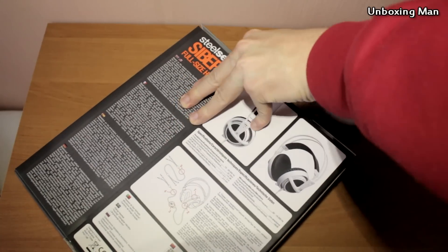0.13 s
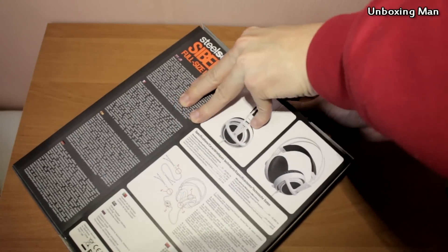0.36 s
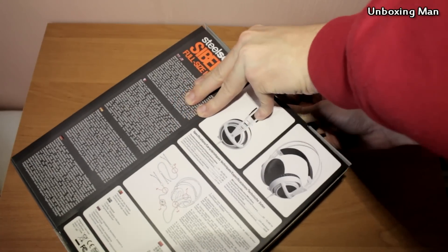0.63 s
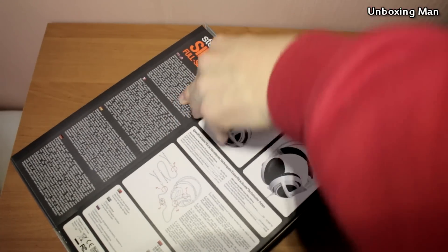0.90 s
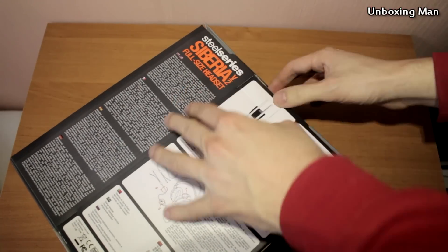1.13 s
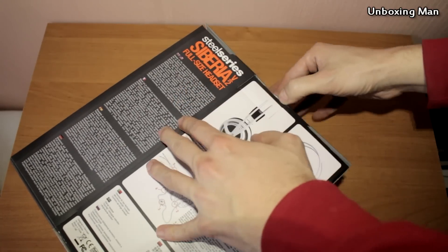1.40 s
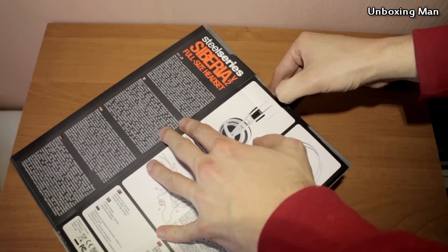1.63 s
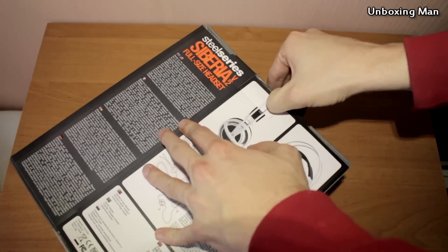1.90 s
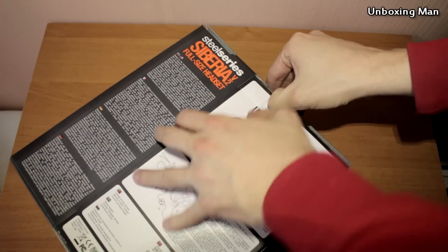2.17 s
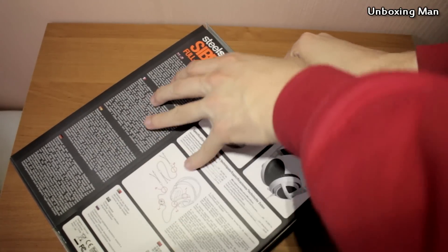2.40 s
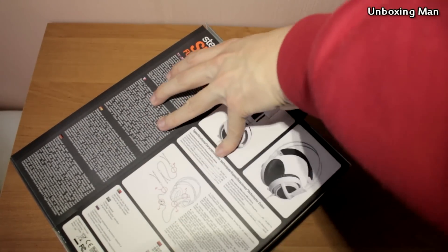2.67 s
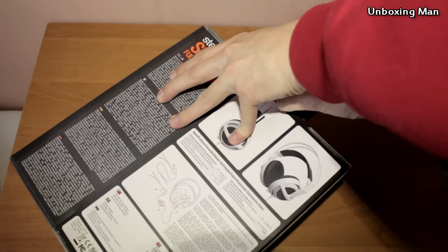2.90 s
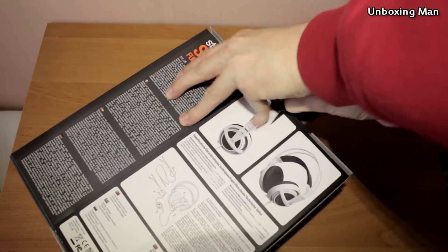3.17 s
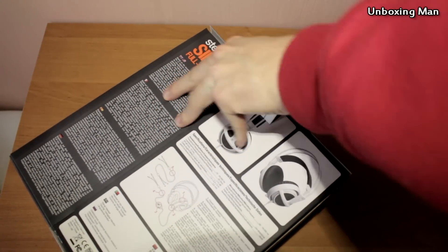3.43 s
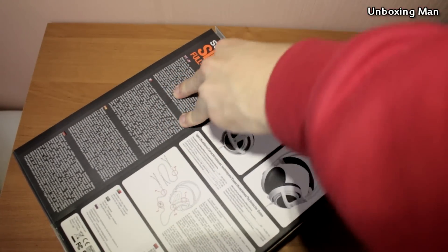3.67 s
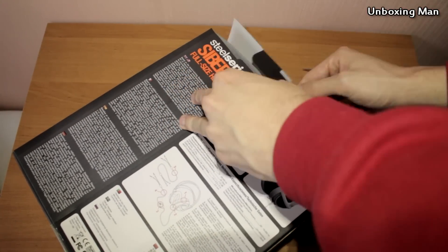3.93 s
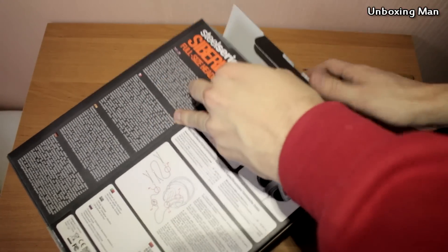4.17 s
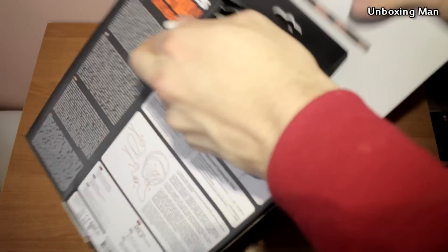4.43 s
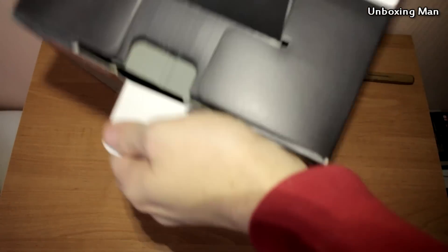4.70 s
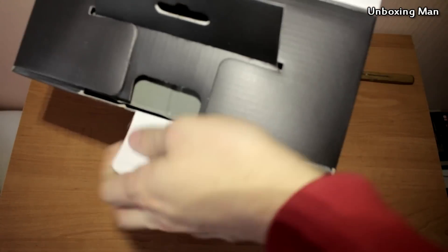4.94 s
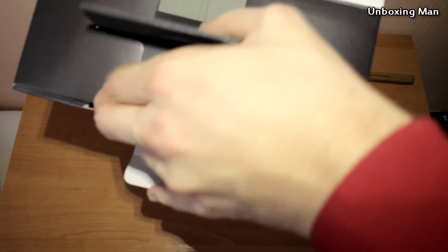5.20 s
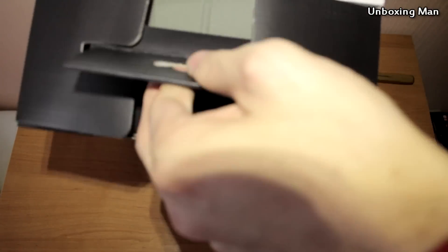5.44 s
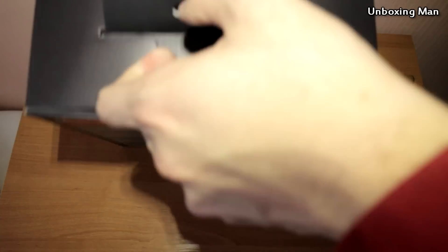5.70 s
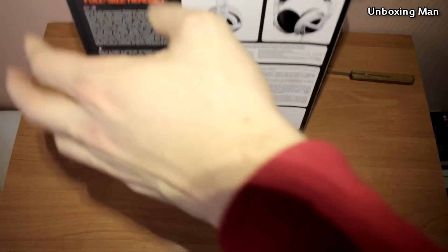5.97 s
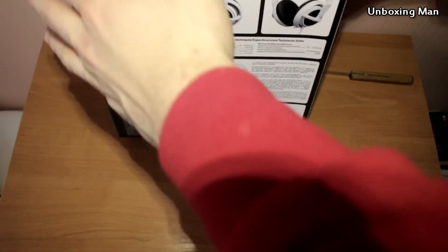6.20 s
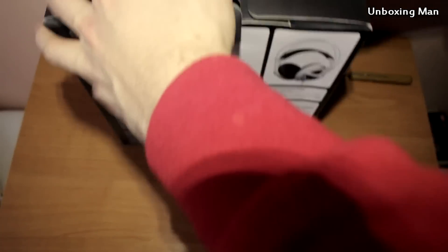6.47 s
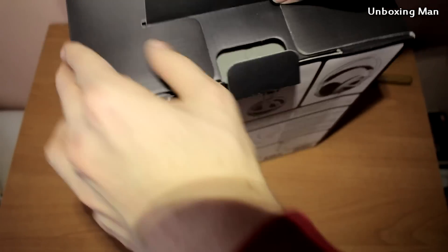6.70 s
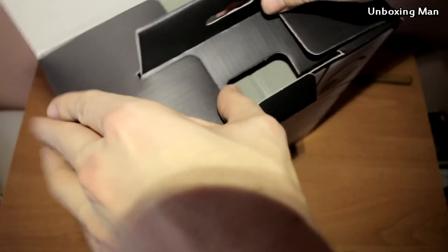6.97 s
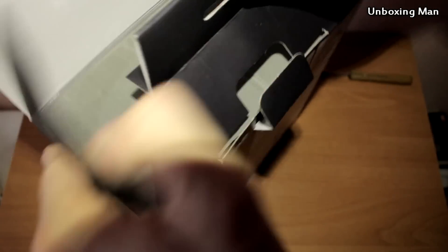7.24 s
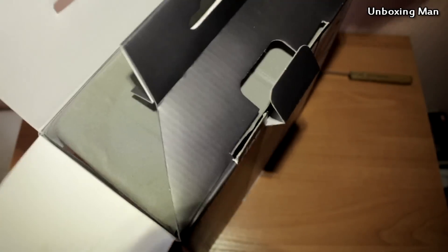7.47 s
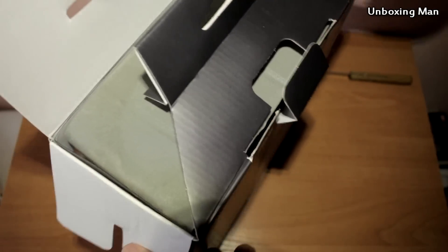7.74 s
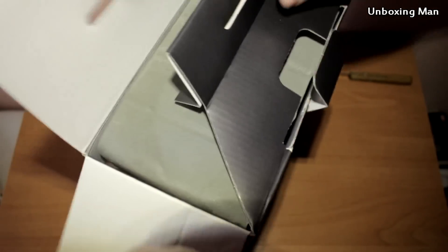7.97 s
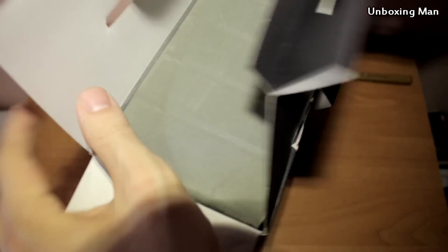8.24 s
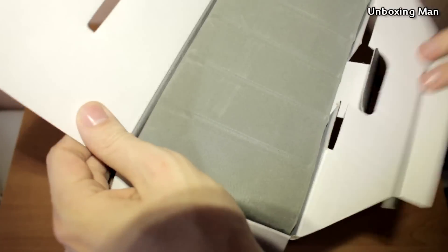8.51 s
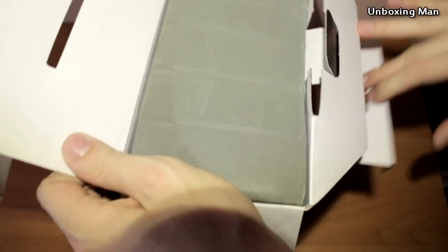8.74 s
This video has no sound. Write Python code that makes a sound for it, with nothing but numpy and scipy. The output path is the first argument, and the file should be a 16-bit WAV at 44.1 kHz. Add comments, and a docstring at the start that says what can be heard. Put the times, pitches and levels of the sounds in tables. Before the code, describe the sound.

Close, dry cardboard unboxing: isolated tape cracks, a flurry of snapping and scraping, hollow box bumps, one hard flap pop, brief squeaks, soft hush.

```python
"""Small room, wooden table: hands open a cardboard box close to a small microphone.
Tape and tabs snap free (shaped noise bursts), the hollow box knocks (decaying sine modes),
card slides on card (gritty noise through resonances), edges squeak (short gliding tones),
stretched tape squeals faintly (wavering sines), over a steady hush (shaped noise)."""
import sys
import numpy as np
from scipy import signal
from scipy.fft import rfft, irfft
from scipy.io import wavfile
from scipy.ndimage import uniform_filter1d

SR = 44100
rng = np.random.default_rng(int(sys.argv[2]) if len(sys.argv) > 2 else 0)


def transcribe(u):
    """Save the signal u as a 16-bit wav file named by the first command-line argument.

    u: samples, shape (n,) or (channels, n), limited to [-1, 1]; the rate is SR.
    q: integer samples, one column per channel.
    """
    v = np.clip(np.atleast_2d(u).T, -1, 1)
    q = np.round(v * 32767).astype(np.int16)
    wavfile.write(sys.argv[1], SR, q)


def volts_from_decibels(level):
    """Turn decibel levels (scalar or array-like) into linear amplitude factors."""
    exponent = np.asarray(level, float) / 20
    return 10 ** exponent


N = 391166
T = np.arange(N) / SR
MS = np.arange(0, N / SR, .001)  # clock of the hand gestures, in s, 1 ms steps


def unit(x):
    """Scale to rms 1."""
    return x / np.sqrt(np.mean(x ** 2))


def band(x, lo_hz, hi_hz, order=2):
    """Butterworth band-pass."""
    return signal.sosfilt(signal.butter(order, [lo_hz, hi_hz], "band", fs=SR, output="sos"), x)


def ring(x, modes):
    """Drive a set of decaying modes: one complex pole each."""
    out = 0
    for hz, db, t60_s in modes:
        pole = np.exp(2j * np.pi * hz / SR - np.log(1000) / (t60_s * SR))
        out = out + volts_from_decibels(db) * signal.lfilter([1], [1, -pole], x).imag
    return out


def walk(rate_hz):
    """Random levels held 1 / rate_hz s and smoothed twice; spread about 1."""
    hold = int(SR / rate_hz)
    steps = np.repeat(rng.standard_normal(N // hold + 1), hold)
    return unit(uniform_filter1d(uniform_filter1d(steps, hold), hold)[:N])


def add(out, s, x):
    """Mix x in at time s."""
    i = int(s * SR)
    out[i:i + len(x)] += x[:N - i]


# tape and tabs letting go; relative levels: [t/s, crack level/dB, crack centre f/Hz,
# card panel level/dB, fizz level/dB]
SNAPS = [(0.037, -1, 6100, -30.5, -11), (0.2848, -30.5, 7200, -48.5, -39), (0.315, -32.5, 7240, -54, -39),
         (0.328, -39, 7330, -56, -41), (0.341, -41, 4300, -61, -39), (0.596, -29, 4790, -42.5, -32.5),
         (0.7682, -41.5, 3397, -52, -54), (0.8345, -38, 7500, -60, -50), (0.8994, -41, 4440, -48, -55),
         (0.9178, -40.5, 7560, -58, -49), (1.2988, -50, 4145, -49, -47.5), (1.4631, -39, 7000, -58, -52),
         (1.4875, -43, 4100, -59, -54), (1.6195, -50, 3820, -64, -42.5), (1.687, -45, 4070, -60, -52.5),
         (1.7093, -32, 4150, -51, -66), (1.7644, -29, 3880, -39, -58), (1.8288, -4.5, 3770, -22.5, -4.5),
         (1.9668, -11, 4400, -28.5, -20.5), (2.4778, -25, 4650, -42.5, -36.5),
         (2.5412, -38.5, 4500, -52, -43), (2.5681, -33.5, 4300, -43, -57.5), (2.82, -28.5, 6060, -46, -37),
         (2.9817, -36, 4120, -46, -55), (3.087, -27, 4510, -31.5, -43), (3.1258, -38, 4610, -51, -51),
         (3.1956, -19.5, 4230, -28, -31), (3.2231, -19, 4080, -34, -50), (3.2324, -37, 4190, -36, -48),
         (3.2438, -10.5, 4090, -19.5, -26), (3.254, -2.5, 4740, -18.5, -21),
         (3.2691, -15.5, 4300, -21.5, -26), (3.3739, -26.5, 3700, -43, -45), (3.4585, -32, 3520, -48, -56),
         (3.5042, -35, 3350, -48, -62), (3.5596, -27.5, 4530, -40, -51),
         (3.6936, -22.5, 3560, -40.5, -37.5), (3.914, -40.5, 4470, -37, -46),
         (3.9532, -18.5, 3760, -35, -36), (4.0045, -6.5, 3870, -14.5, -24), (4.0469, -4.5, 3940, -15, -23),
         (4.1473, -14.5, 4700, -19, -45), (4.3734, -25.5, 3890, -43, -45), (4.4897, -14, 4280, -31.5, -30),
         (4.5226, -40, 4420, -52, -52), (4.6467, -32, 4550, -42, -49), (4.849, -12.5, 3450, -23, -29),
         (4.8573, -14, 3600, -21, -31), (4.8785, -20, 3630, -30, -39), (5.0888, -39.5, 4200, -52.5, -64),
         (5.244, -28, 4130, -43.5, -44), (5.2664, -33.5, 4300, -46, -46), (5.319, -30, 3520, -43.5, -48),
         (5.3475, -33, 4400, -53, -50), (5.4221, -19, 3470, -33, -36), (5.5464, -27, 4530, -42, -38),
         (5.663, -34.5, 3540, -44, -50), (5.7394, -20, 3500, -37, -39), (5.7534, -34, 4200, -36, -44),
         (5.7886, -21.5, 4080, -44, -33), (5.8684, -32, 4220, -45, -44), (5.911, -26.5, 3670, -57, -46),
         (6.0509, -29, 4020, -31.5, -48), (6.104, -39, 4020, -34.5, -54), (6.1626, -34, 4150, -46, -53),
         (6.44, -35, 3220, -38.5, -62), (6.536, -34, 3990, -43, -52), (6.6511, -32, 4370, -40, -49),
         (6.7192, -34, 4400, -66, -49), (7.1095, -50, 3400, -56, -57), (7.158, 2.5, 3770, -17, -20),
         (7.164, -12.5, 3770, -26, -33), (7.2838, -10, 5400, -25, -31), (7.4837, -38, 3220, -50, -55),
         (7.53, -34.5, 3840, -28.5, -53), (7.809, -37, 3500, -42, -55), (8.097, -29.5, 3850, -38.5, -54.5),
         (8.1454, -31, 5940, -33, -45), (8.1736, -36, 3950, -31.5, -53), (8.2879, -30, 4560, -36, -41),
         (8.4257, -22, 3960, -46, -37), (8.5966, -23, 4570, -33, -33.5), (8.6182, -19, 5770, -27, -25),
         (8.737, -14.5, 3850, -31.5, -42)]
# flat card panel modes: [f/Hz, relative level/dB, t60/s]
PANEL = [(1023, -7.5, 0.04), (1373, 3.5, 0.01), (1599, 5.5, 0.0099), (2003, 4.5, 0.00583),
         (2355, -5.5, 0.019)]
SNAP_RISE_S, SNAP_DECAY_MS = 0.0011, 3.2


def snaps():
    """A few ms of tearing fibres that also jolt the card panel; returns near sound, wall feed."""
    drive = np.zeros((2, 3, N))
    t = np.arange(2048) / SR
    tearing = rng.standard_normal((len(SNAPS), len(t)))
    for (s, crack_db, hz, panel_db, fizz_db), tear in zip(SNAPS, tearing):
        burst = tear * (1 - np.exp(-t / SNAP_RISE_S)) * np.exp(-(t * 1000 / SNAP_DECAY_MS) ** 2)
        burst /= np.abs(burst).max()
        # summed over all directions the burst has no colour of its own: one tick of equal energy
        tick = np.sqrt(np.sum(burst ** 2)) * (t == 0)
        for (crack, jolt, fizz), push in zip(drive, (burst, tick)):
            add(crack, s, volts_from_decibels(crack_db) * band(push, hz / 1.25, hz * 1.36, order=1))
            add(jolt, s, volts_from_decibels(panel_db) * push)
            add(fizz, s, volts_from_decibels(fizz_db) * push)
    outputs = []
    for crack, jolt, fizz in drive:
        tear = volts_from_decibels(8) * band(crack, 2200, 12000)
        panel = volts_from_decibels(-12.5) * ring(jolt, PANEL)
        hiss = volts_from_decibels(10.5) * band(fizz, 4500, 17000)
        outputs.append(tear + panel + hiss)
    return outputs


# blows on the hollow box; relative levels: [t/s, strength level/dB, favoured mode f/Hz,
# upper modes level/dB]
KNOCKS = [(0.036, -31, 453, 1), (0.203, -46, 307, -10), (0.74, -36, 339, -4.5), (0.899, -37.5, 310, -16),
          (0.961, -41, 320, -16), (1.084, -48.5, 288, -17), (1.152, -44.5, 328, -13),
          (1.307, -38.5, 320, -15), (1.469, -50.5, 439, -11), (1.765, -39, 301, -7), (1.828, -26.5, 525, 2),
          (1.97, -38.5, 315, -4), (2.319, -45, 288, -16), (2.421, -46, 283, -19), (2.571, -44.5, 312, -13),
          (2.688, -49, 350, -11), (2.984, -37.5, 440, -7), (3.09, -30, 330.6, -13),
          (3.198, -23.5, 439, -7.5), (3.254, -9.5, 467, -12), (3.378, -33.5, 323, -6),
          (3.458, -29.5, 330, -22), (3.56, -38, 452, -17), (3.653, -42.5, 431, -4.5),
          (3.838, -42.5, 452, -14), (3.923, -39, 424, -16), (3.953, -32, 619, 0), (4.006, -15, 315, -4),
          (4.054, -16, 283, -9), (4.151, -21.5, 314, -4), (4.311, -47, 334, -19), (4.36, -32.5, 436, -15),
          (4.415, -31, 307, -22), (4.49, -23, 584, -1.5), (4.548, -33, 501, 2), (4.85, -10, 370, -3.5),
          (4.97, -35.5, 315, -15), (5.025, -34.5, 360.5, -17), (5.087, -37, 457, -26),
          (5.12, -37.5, 468, -26), (5.241, -27.5, 315, -7), (5.279, -29, 413, -7), (5.349, -32, 369, -17),
          (5.394, -36, 371, -16), (5.427, -32.5, 315, -1), (5.54, -39, 318, -3), (5.593, -34, 310, -9),
          (5.685, -29.5, 320, -9), (5.745, -19.5, 400, -6), (5.847, -34, 390, -10), (5.915, -36, 366, -24),
          (5.974, -38, 514, -26), (6.058, -19.5, 406, -6.5), (6.113, -30.5, 315, 0), (6.164, -34, 444, -17),
          (6.232, -31, 440, -10), (6.336, -25.5, 315, -7), (6.446, -28.5, 312, -6), (6.546, -27, 301, -13),
          (6.648, -27, 307, -11), (6.871, -33.5, 331, -10), (7.017, -32.5, 563, -6),
          (7.161, -6.5, 307, -16.5), (7.299, -19.5, 406, -12), (7.483, -34, 468, -6),
          (7.535, -19.5, 423, -6.5), (7.645, -39.5, 415, -9), (7.773, -36.5, 366, -24),
          (7.936, -34.5, 436, -21), (8.094, -35, 439, -8), (8.143, -32.5, 377, 2), (8.296, -32.5, 374, -7),
          (8.426, -36, 440, -12), (8.569, -39.5, 443, -6), (8.614, -22, 385, -6), (8.63, -15.5, 440, -9.5),
          (8.743, -39, 315, -14)]
# box, air and wall modes, undamped by hands: [nominal f/Hz, relative level/dB, t60/s]
BOX = [(270.6, -33, 0.027), (315, 4, 0.085), (401.6, 1.5, 0.061), (451.7, 8.5, 0.038), (553.5, 0, 0.046),
       (611, -2, 0.087), (703.5, -2.5, 0.067), (830, -5, 0.037), (900, -4.5, .07), (1106, -1, 0.043),
       (1268, -4, 0.0486)]
RING_SHARE = 0.91  # hands damp the box


def knocks():
    """A push sets box modes going; its place favours some, harder contact wakes the upper ones."""
    out = np.zeros(N)
    hz, db, t60_s = np.transpose(BOX)[:, :, None]
    t = np.arange(8192) / SR
    chance = rng.standard_normal((len(KNOCKS), 3, len(BOX), 1))
    for (s, strength_db, near_hz, upper_db), (size, detune, start) in zip(KNOCKS, chance):
        reach_db = np.where(hz < 580, -9 * np.abs(np.log2(hz / near_hz)), upper_db)
        rise = 1 - np.exp(-t * hz / 1.2)
        fade = np.exp(-np.log(1000) * t / (t60_s * RING_SHARE)) * rise
        phase = 2 * np.pi * hz * (1 + 0.0274 * detune) * t + 1.34 * start
        modes = volts_from_decibels(db + 2.5 * size + reach_db) * fade * np.sin(phase)
        blow = modes.sum(axis=0)
        add(out, s, volts_from_decibels(strength_db + 3.5) * blow / np.abs(blow).max())
    return out


def grit(spread_db, flutter_db, flutter_hz):
    """Fibres catching and letting go: dense clicks of uneven size, in an unsteady stream."""
    catch = np.minimum(rng.exponential(size=N), 5)
    size = volts_from_decibels(spread_db * catch + flutter_db * walk(flutter_hz))
    return size * rng.standard_normal(N)


def scatter(per_s):
    """Lone clicks at random moments, a few strong among many weak."""
    return unit((rng.random(N) < per_s / SR) * rng.exponential(size=N))


def shifting(drive, modes):
    """As the contact shifts, the same effort passes from one resonance to another."""
    share = np.array([volts_from_decibels(5.3 * walk(30)) for _ in modes])
    share /= np.sqrt(np.sum(share ** 2, axis=0))
    return unit(sum(part * ring(drive, [mode]) for part, mode in zip(share, modes)))


SETTLE_DELAY_S, SETTLE_DB, SETTLE_DB_PER_S = 0.011, -22, 296.5  # SETTLE_DB re blow strength


def settle(s, db):
    """Gain of the box shuffling to rest after a blow: quick start, steady fade."""
    return volts_from_decibels(db - np.where(MS < s, 1500 * (s - MS), SETTLE_DB_PER_S * (MS - s)))


STROKE_RISE = 1.015  # rise time over fade time
STROKE_FLAT = 2  # larger = flatter top, steeper sides


def stroke(s, fade_s):
    """Gain of one stroke: the hand speeds up, holds and stops."""
    away = np.abs(MS - s) / np.where(MS < s, STROKE_RISE, 1) / np.clip(fade_s, .01, 1)
    return volts_from_decibels(-20 * away ** STROKE_FLAT)


# strokes of card on card: [peak t/s, 20 dB fade t/s (held within 0.01..1), edge scrape level/dB,
# card panel level/dB, fizz level/dB]
STROKES = [(.317, 0.23, -60.5, -61, -66), (.573, -0.1, -60, -60, -57), (.605, 0.02, -66, -57, -73),
           (0.977, 0.16, -54.5, -59.5, -59), (1.33, 0.2, -61.5, -68, -71), (1.55, 0.16, -69, -79, -69),
           (1.776, 0.32, -59.5, -64, -61.5), (2.574, -0.12, -58, -62.5, -68),
           (2.995, 0.27, -67, -61.5, -78), (3.374, 0.38, -67, -58.5, -73), (3.474, 0.3, -63.5, -65, -64.5),
           (3.575, 0.06, -49.5, -60, -59), (3.699, 0.06, -49, -54, -60), (3.932, 0.09, -50, -47, -56),
           (4.008, 0.05, -30.5, -36.5, -44), (4.095, 0.06, -29.5, -42, -35), (4.182, 0.03, -30, -38, -33),
           (4.324, .033, -34, -48, -44), (4.38, 0.1, -50, -45.5, -61), (4.451, 0.0259, -33.5, -46.5, -39.5),
           (4.54, 0.17, -72, -56, -76), (4.633, 0.16, -47, -56, -49.5), (4.838, -0.08, -50.5, -52, -59.5),
           (4.97, 0.2, -66, -62.5, -72), (5.035, 0.14, -55.5, -64, -58), (5.271, 0.02, -40.5, -41.5, -53),
           (5.385, 0.07, -41.5, -52, -50), (5.432, 0.01, -41, -35.5, -49), (5.555, 0.08, -50, -51.5, -60),
           (5.686, 0.01, -48, -42.5, -58), (5.768, 0.0142, -39.5, -42, -58), (5.83, .07, -47.5, -61, -58),
           (5.898, 0.24, -54, -59, -58.5), (5.993, 0.03, -49.5, -47, -70), (6.065, 0.08, -51.5, -59, -60),
           (6.22, -0.01, -46, -55, -55), (6.338, 0.01, -47, -46, -63), (6.503, .045, -47, -48, -55),
           (6.67, .25, -50, -72, -53.5), (6.83, .2, -54.5, -62, -56), (6.938, -0.12, -58, -45, -70),
           (7.13, 0.23, -54, -58, -65), (7.152, -0.05, -43, -45, -53), (7.256, 0.0151, -31, -54, -31.5),
           (7.298, 0.0217, -27.5, -47, -28), (7.48, 0.52, -50.5, -59, -53.5), (7.801, -0.05, -42, -57, -53),
           (7.905, -0.05, -44.5, -61, -50), (8.115, -0.05, -45.5, -53.5, -57.5),
           (8.165, 0.01, -55, -42, -61), (8.3, 1, -65.5, -67, -83), (8.433, -1, -60.5, -86, -69),
           (8.523, 0.7, -53.5, -79, -60.5), (8.627, -0.0324, -23, -49, -39), (8.714, 0.15, -58, -62, -61),
           (8.87, .08, -51, -51.5, -57)]
# hands holding and turning the box: [t/s, box rumble level/dB]
HANDLING = [(0, -62.5), (.3, -57.5), (.67, -67), (.91, -63), (1.83, -59), (2.17, -65), (3.01, -58.5),
            (3.31, -50), (3.41, -50.5), (3.65, -59), (3.85, -60), (4.05, -67), (4.27, -71), (4.42, -46.5),
            (4.62, -39.5), (4.72, -58), (4.97, -49.5), (5.21, -65), (5.27, -37), (5.38, -47), (5.5, -52),
            (5.98, -47), (6.29, -47.5), (6.35, -40), (6.42, -64), (6.6, -49), (7.01, -49), (7.39, -46),
            (7.7, -56), (8.04, -53), (8.15, -46.5), (8.5, -58.5), (8.87, -51.5)]
# sliding edge modes: [f/Hz, relative level/dB, t60/s]
EDGE = [(2700, -5.5, 0.0033), (3320, -0.5, 0.0027), (3850, -3, 0.0039), (4480, -2.5, 0.0036),
        (6100, -1, 0.00184), (6470, -4, 0.0021), (7000, -7, 0.0016)]
GRIP_EDGE_DB, GRIP_PANEL_DB, GRIP_FIZZ_DB = -16.5, -20.5, -30  # re rumble
THUMPS_PER_S, THUMP_DB = 14, -7.5  # fingertips shifting on the box; dB re grit


def rubbing():
    """Card sliding on card and table rumbles in the box, rustles the panels, hisses off the edge."""
    grip = volts_from_decibels(np.interp(MS, *np.transpose(HANDLING)))
    box = grip + sum(settle(s + SETTLE_DELAY_S, db + SETTLE_DB) for s, db, *_ in KNOCKS)
    grip_gains = grip * volts_from_decibels(np.array([[GRIP_EDGE_DB], [GRIP_PANEL_DB], [GRIP_FIZZ_DB]]))
    stroke_gains = sum(stroke(s, fade_s) * volts_from_decibels(np.array(db)[:, None]) for s, fade_s, *db in STROKES)
    edge, panel, hiss = grip_gains + stroke_gains
    box, edge, panel, hiss = (np.interp(T, MS, gain) for gain in (box, edge, panel, hiss))
    box_drive = unit(grit(2.54, 2.8, 40)) + volts_from_decibels(THUMP_DB) * scatter(THUMPS_PER_S)
    rumble = unit(ring(box_drive, BOX[:7]))
    surface = unit(grit(2.25, 2.7, 170))
    rustle = shifting(surface, PANEL)
    scrape = shifting(surface, EDGE)
    fizz = unit(band(surface, 8070, 15000) * volts_from_decibels(2.0 * walk(40)))
    return box * rumble + panel * rustle + edge * scrape + hiss * fizz


# an edge binding for a moment: [t/s, start f/Hz, end f/Hz, peak level before chop/dB, length/ms]
SQUEAKS = [(3.455, 3570, 3600, -39, 14), (3.5, 3300, 3400, -41, 16), (6.334, 3570, 3860, -36.5, 15.7),
           (7.244, 3970, 3800, -32, 17), (7.289, 6130, 4820, -13.5, 13), (7.298, 7500, 6470, -14, 10.2),
           (7.309, 4490, 4480, -27.5, 21), (8.24, 2700, 2820, -47.5, 21)]
CHOP_HZ, CHOP_DEPTH = 400, 0.39


def squeaks():
    """A short rough tone, chopped as the shaking box lifts the edge off and back."""
    out = np.zeros(N)
    rough = rng.standard_normal((len(SQUEAKS), 64))
    for (s, start_hz, end_hz, db, ms), wobble in zip(SQUEAKS, rough):
        u = np.linspace(0, 1, int(ms * SR / 1000))
        glide_hz = start_hz + (end_hz - start_hz) * u
        hz = glide_hz * (1 + 0.061 * np.interp(64 * u, np.arange(64), wobble))
        chop = 1 + CHOP_DEPTH * np.sin(2 * np.pi * CHOP_HZ * u * ms / 1000)
        tone = np.sin(2 * np.pi * np.cumsum(hz) / SR)
        add(out, s, volts_from_decibels(db) * np.sin(np.pi * u) * chop * tone)
    return out


# stretched tape, before waver: [t/s, f/Hz, rms level of the lowest tone/dB]
SQUEAL = [(1.3, 7820, -74.5), (1.4, 7990, -62.5), (1.445, 7720, -68), (1.509, 9100, -72),
          (1.61, 10100, -76), (1.656, 10400, -72), (1.732, 9960, -69), (1.78, 10600, -64),
          (1.828, 11200, -68)]


def squeal():
    """A thin wavering tone that climbs as the tape tightens, with two fainter upper modes."""
    s, hz, db = np.transpose(SQUEAL)
    wavering_hz = np.interp(T, s, hz) * (1 + 0.0023 * walk(67))
    phase = 2 * np.pi * np.cumsum(wavering_hz) / SR
    level = volts_from_decibels(np.interp(T, s, db, -150, -150) + 1.1 * walk(50))
    tight = np.clip((T - 1.5) / .25, 0, 1)
    upper = volts_from_decibels(-9) * tight ** 4 * np.sin(1.19 * phase) + volts_from_decibels(-7) * tight * np.sin(1.375 * phase)
    return np.sqrt(2) * level * (np.sin(phase) + upper)


# hush spectrum: [f/Hz, relative level per Hz/dB]
ROOM_NOISE = [(35, -84), (60, -16), (389, 1.5), (515, -5), (1010, -12), (1110, -9.5), (1280, -13.5),
              (2410, -16), (5860, -18), (12700, -26.5), (16000, -63.5)]
ROOM_NOISE_DB = -58.5  # rms before the slow waver


def room_noise():
    """Hush of the room and the microphone: noise shaped in frequency, its level barely wavering."""
    hz, db = np.transpose(ROOM_NOISE)
    colour = volts_from_decibels(np.interp(np.log(np.fft.rfftfreq(N, 1 / SR) + 1), np.log(hz), db))
    hush = unit(irfft(rfft(rng.standard_normal(N)) * colour, N))
    return volts_from_decibels(ROOM_NOISE_DB) * hush * volts_from_decibels(0.26 * walk(8.7))


# wall tail decay: [f/Hz, t60/s]
ROOM_T60 = [(300, 0.32), (1500, 0.26), (4000, 0.22), (10000, 0.16)]
BOUNCE_GAIN, BOUNCE_S, TAIL_RISE_S = 0.082, 0.001207, .006


def room(near, far, wet_db):
    """Table bounce, then a dense tail from the walls that dies sooner in the treble."""
    t = np.arange(SR // 2) / SR
    hz, t60_s = np.transpose(ROOM_T60)
    tail = 0
    for centre_hz in 250 * 2. ** np.arange(6):
        fade = np.exp(-np.log(1000) * t / np.interp(np.log(centre_hz), np.log(hz), t60_s))
        noise = rng.standard_normal(len(t))
        tail = tail + fade * band(noise, centre_hz / np.sqrt(2), centre_hz * np.sqrt(3))
    tail *= 1 - np.exp(-t / TAIL_RISE_S)
    walls = volts_from_decibels(wet_db) * signal.fftconvolve(far, tail / np.sqrt(np.sum(tail ** 2)))[:N]
    return near + BOUNCE_GAIN * np.roll(near, int(BOUNCE_S * SR)) + walls


def scene():
    """Hits and strokes ring the room; squeal and hush are added without it."""
    (near, far), box, edge, rub = snaps(), knocks(), squeaks(), rubbing()
    near_mix = near + box + edge + rub
    wall_feed = far + box + edge + volts_from_decibels(-4) * rub
    return (room(near_mix, wall_feed, wet_db=-12.5) + squeal() + room_noise())[None]


def roll_off(x):
    """The treble ends steeply here."""
    return signal.sosfilt(signal.butter(12, 16450, fs=SR, output="sos"), x)


def record(dry):
    """Small microphone: presence peak, loss of bass and top, rounding of the loudest snaps."""
    b, a = signal.iirpeak(4200, 4.0, fs=SR)
    x = dry + signal.lfilter(b, a, dry)
    x = band(x, 229.0, 11880, order=4)
    mix = np.tanh(0.67 * x) / 0.88
    return roll_off(mix)


dry = scene()
out = record(dry)
transcribe(out)
```